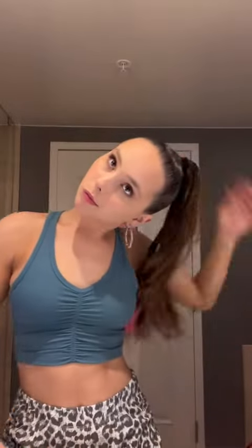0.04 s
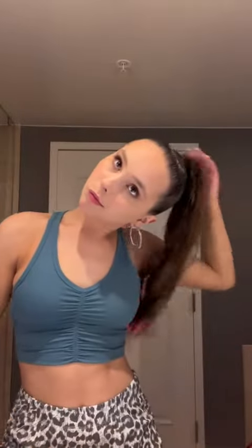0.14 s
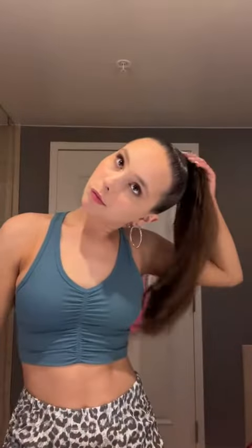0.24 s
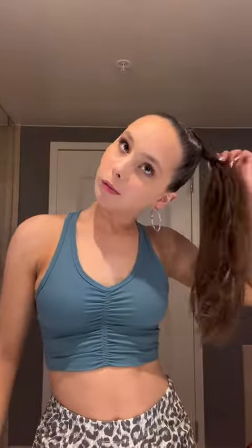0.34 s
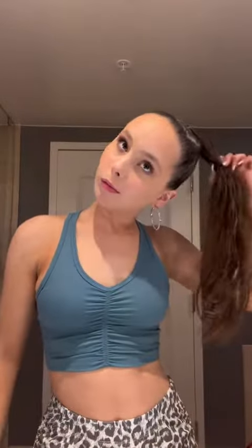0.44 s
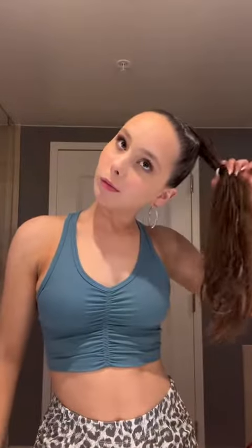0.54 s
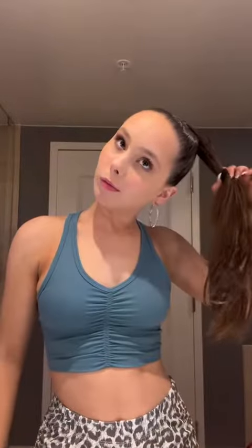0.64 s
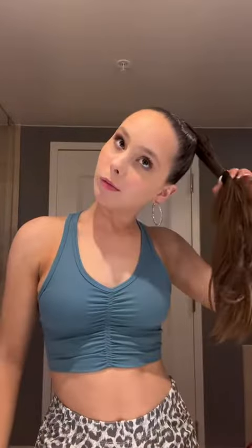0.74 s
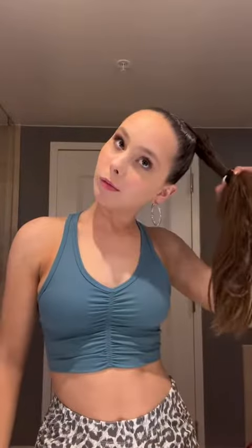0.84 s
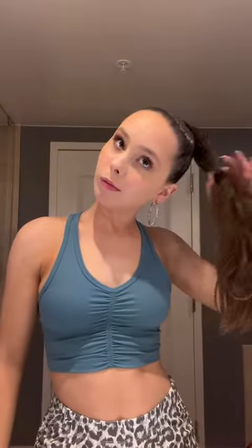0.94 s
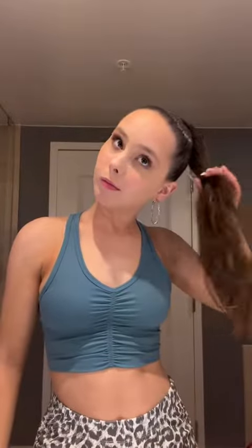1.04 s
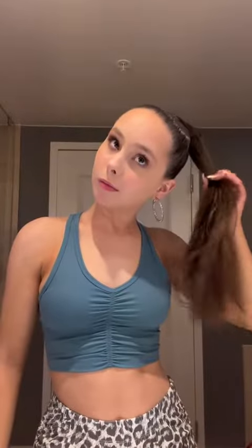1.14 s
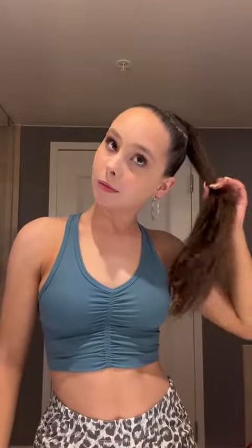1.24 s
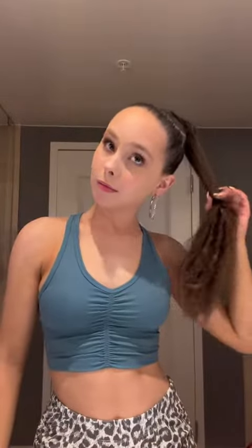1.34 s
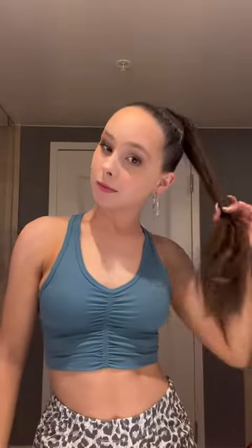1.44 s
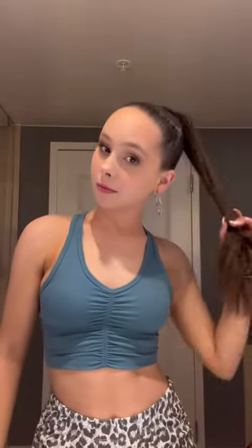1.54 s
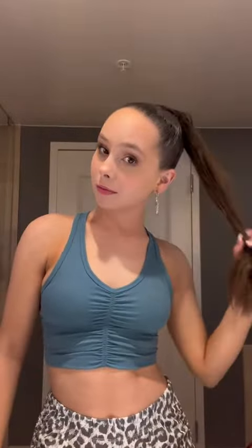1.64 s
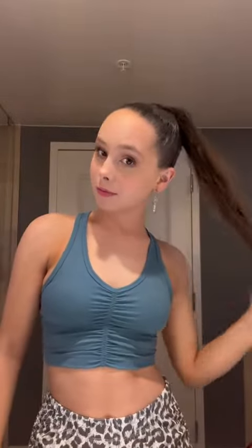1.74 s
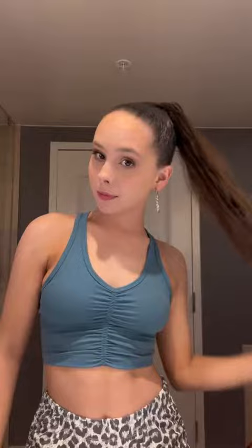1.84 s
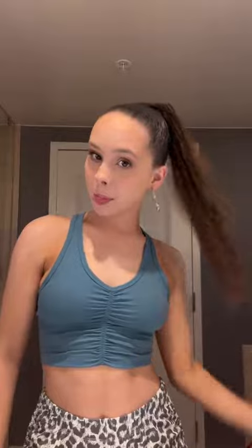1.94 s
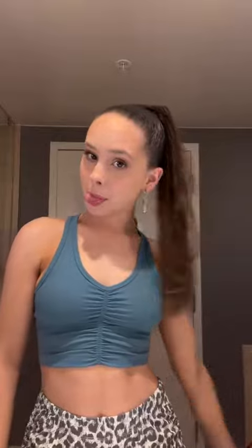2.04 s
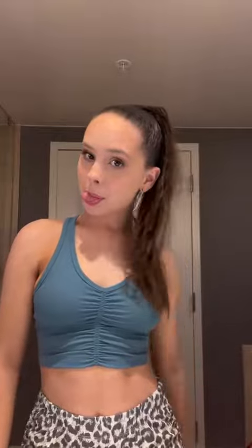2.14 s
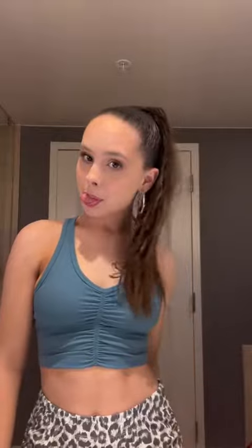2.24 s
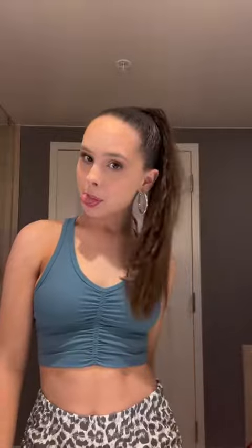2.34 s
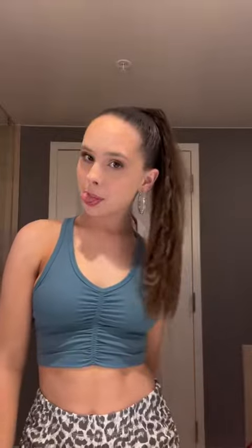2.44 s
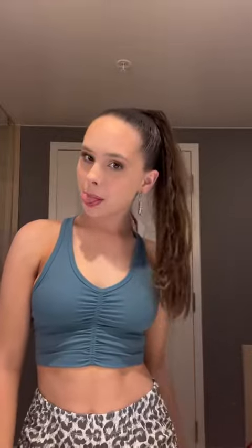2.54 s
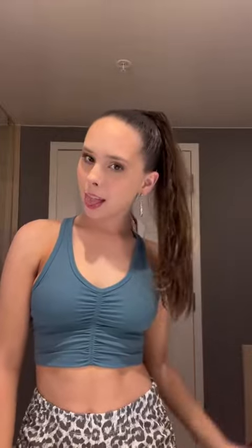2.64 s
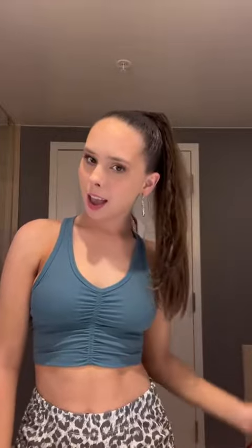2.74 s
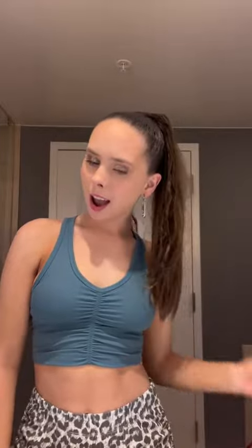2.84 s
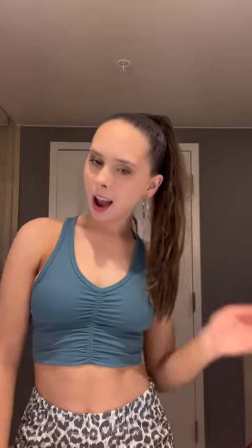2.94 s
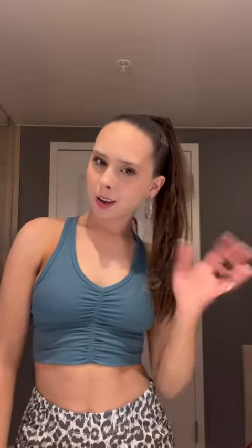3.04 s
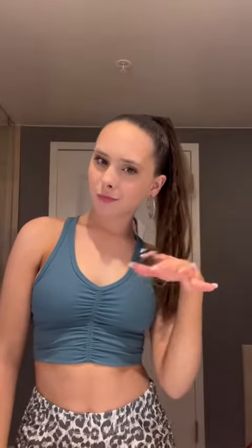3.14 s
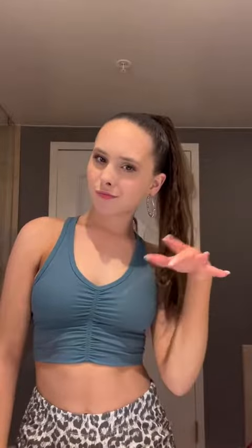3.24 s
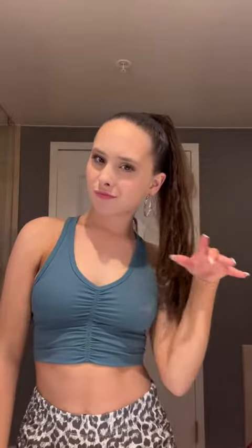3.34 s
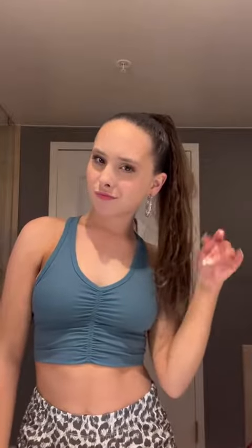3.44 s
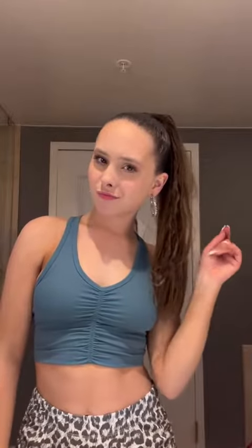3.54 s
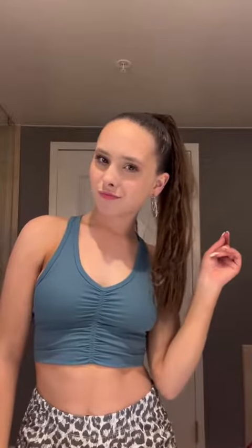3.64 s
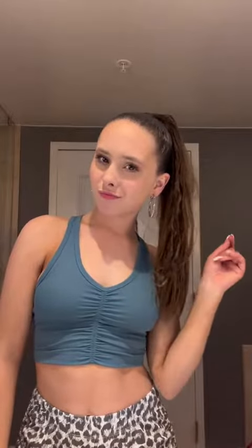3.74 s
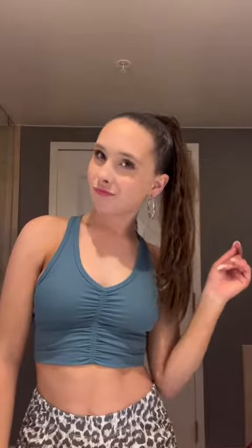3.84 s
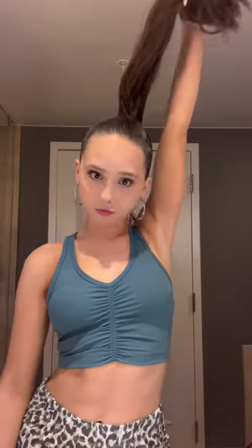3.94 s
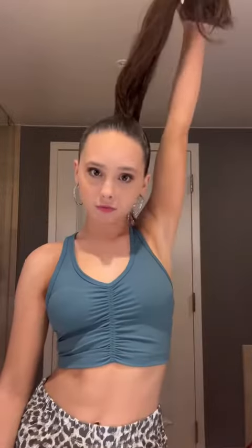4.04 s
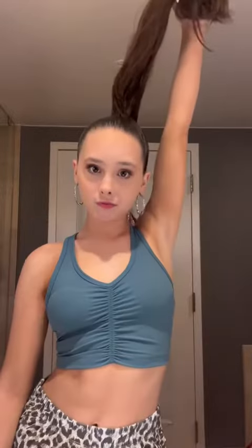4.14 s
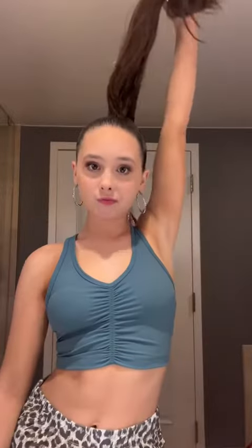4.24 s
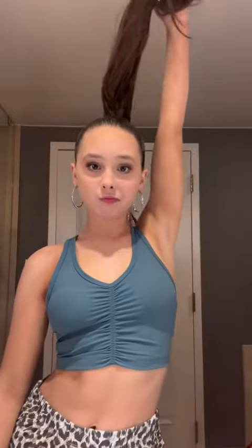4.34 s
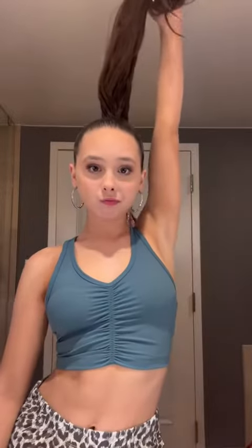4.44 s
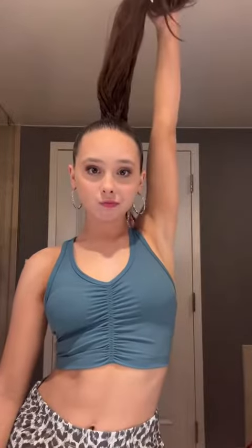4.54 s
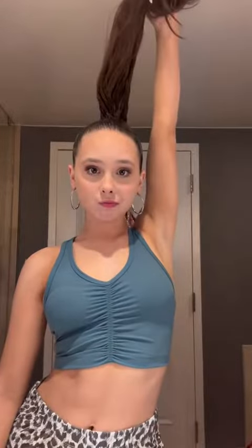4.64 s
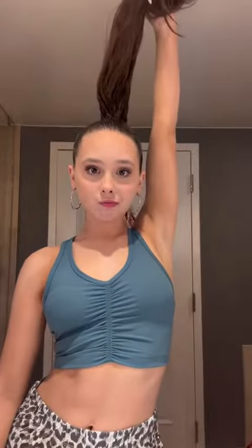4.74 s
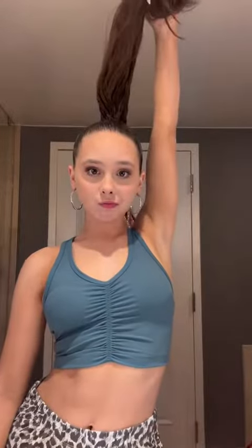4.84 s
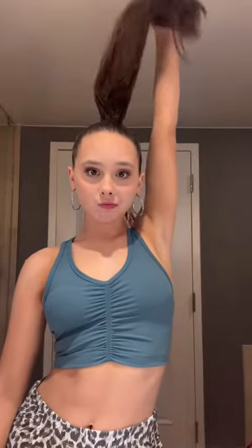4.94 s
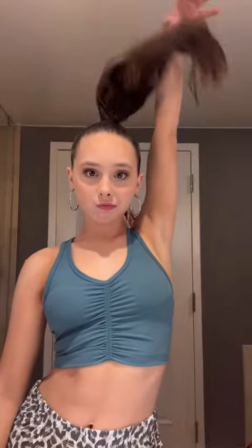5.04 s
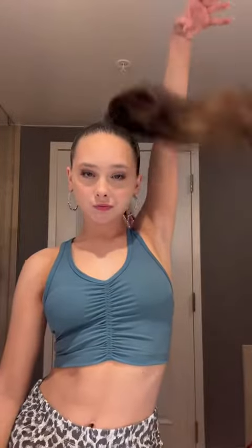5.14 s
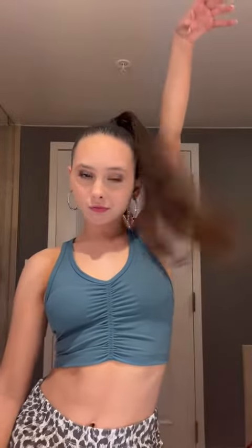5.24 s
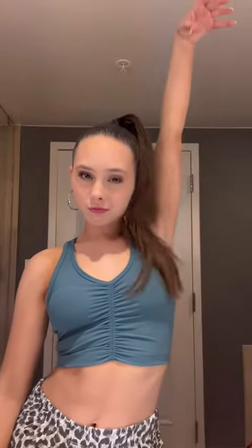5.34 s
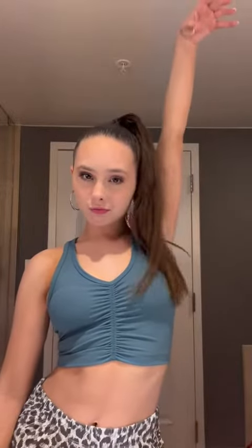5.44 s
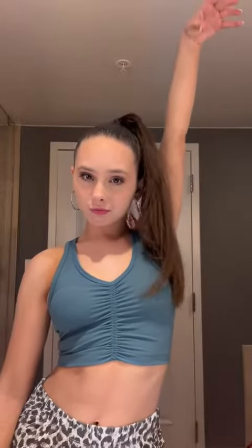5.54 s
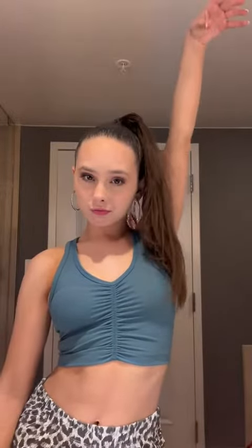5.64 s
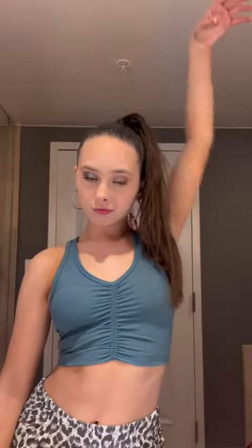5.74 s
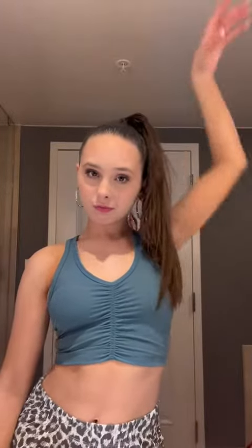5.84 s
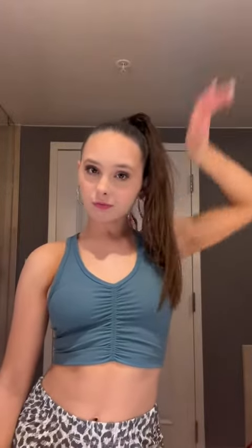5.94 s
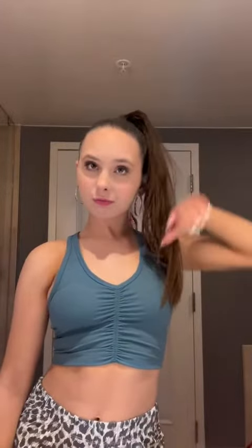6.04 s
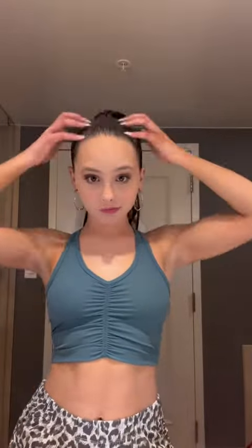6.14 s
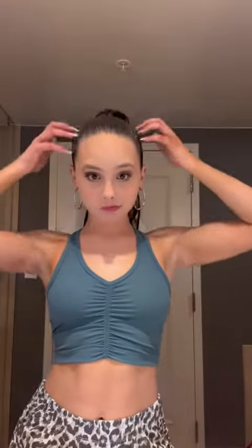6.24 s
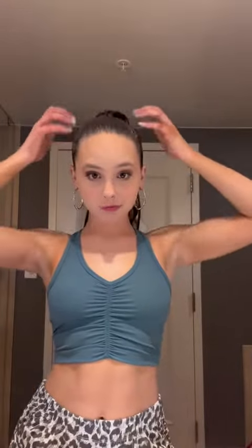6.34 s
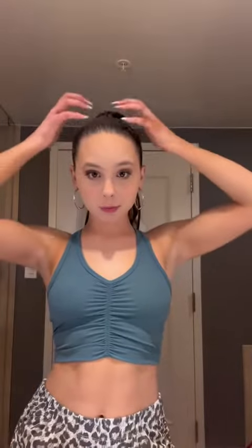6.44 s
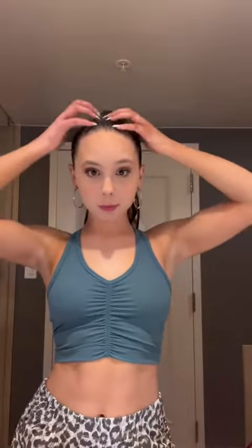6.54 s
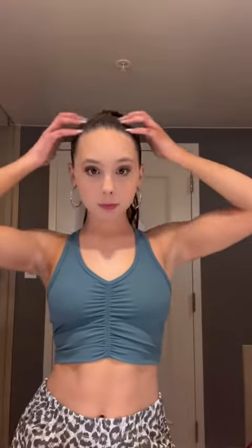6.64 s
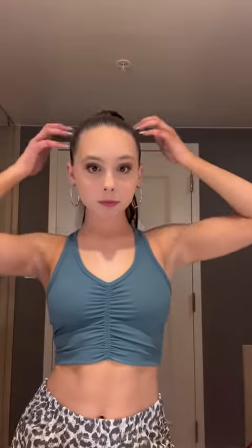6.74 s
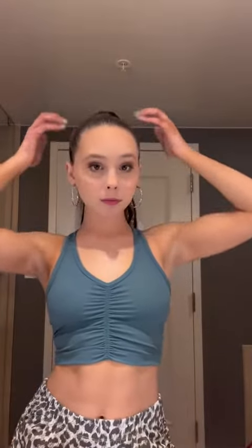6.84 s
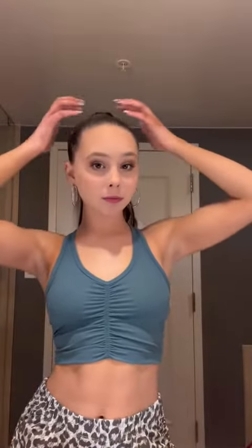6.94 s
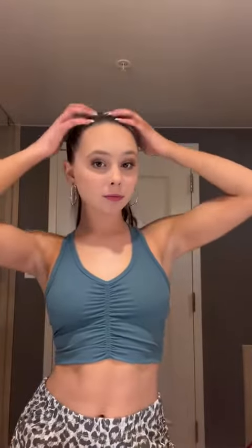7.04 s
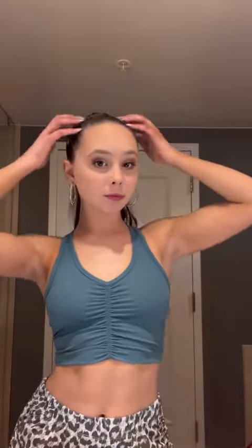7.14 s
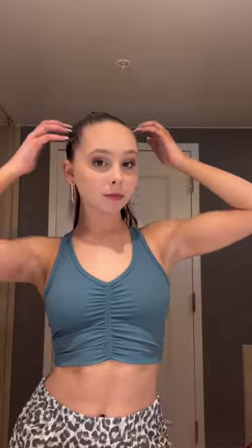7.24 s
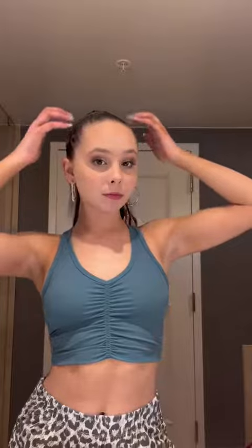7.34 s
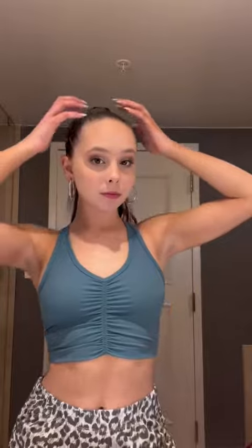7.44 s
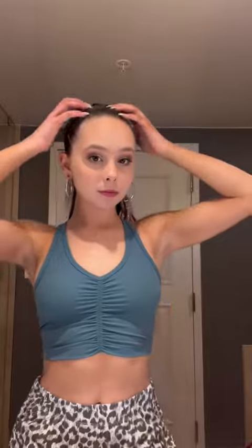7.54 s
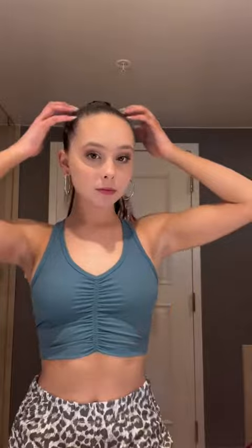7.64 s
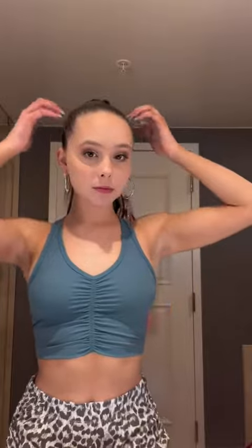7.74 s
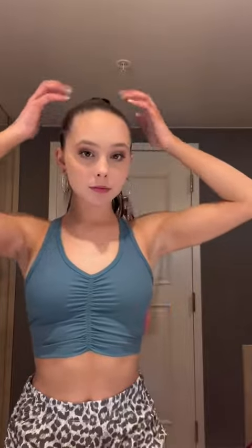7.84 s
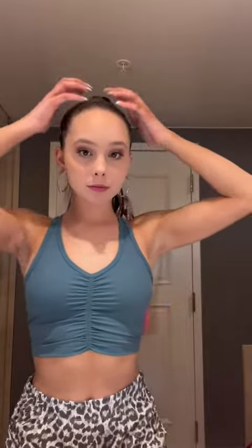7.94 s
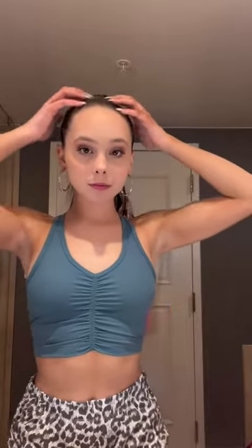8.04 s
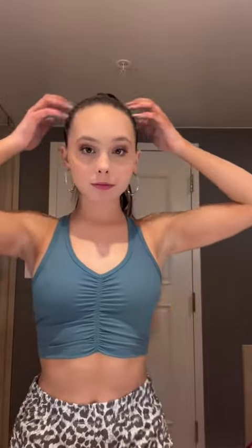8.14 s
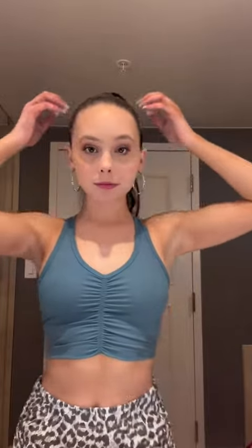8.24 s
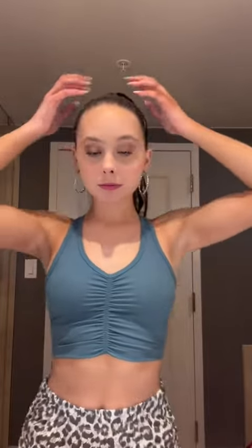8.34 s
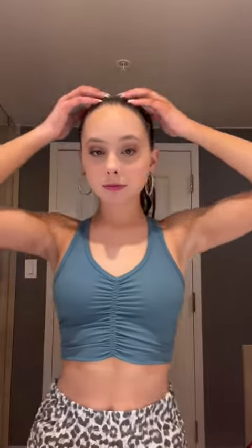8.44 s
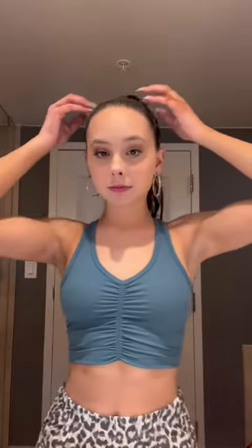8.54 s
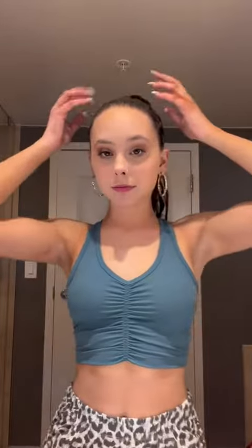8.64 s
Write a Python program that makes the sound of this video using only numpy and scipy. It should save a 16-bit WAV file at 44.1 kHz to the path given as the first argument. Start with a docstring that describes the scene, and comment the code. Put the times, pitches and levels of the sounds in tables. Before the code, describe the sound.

A small, quiet room has a wavering low rumble, a faint hum and thin hiss, with occasional soft bass swells. From 0 to about 3.2 seconds, a hand slides along loose hair with very faint, fine rustles and a few tiny nail ticks, slightly clearer around 1.7. At 3.3 a single finger snap cracks out, by far the loudest sound, hollow and woody with a brief room echo; a barely audible finger touch follows near 3.65. At 3.9 comes a tiny, dry double crackle. Near-quiet until about 5.26, when lifted hair drops onto a shoulder with a soft, brushy pat. From 6.15, both hands smooth tight hair in six short, crisp, raspy strokes, near 6.2, 6.65, 7.15, 7.65, 8.1 and 8.5, each swelling and fading quickly. Sharp nail ticks accompany several strokes. The pickup is close, the last stroke near the end.

```python
"""Hair and hands in a small room

Someone plays with a slicked-back ponytail in front of a phone in a small, quiet room. A hand runs
down the ponytail (stick-slip clicks), the fingers snap once (damped modes and a filtered blow), a dry
crackle follows (noise bursts), the lifted hair drops onto a shoulder, then both hands smooth the tight
hair over the scalp six times (denser clicks, nails ticking on strands). The room rumbles softly (noise,
faint hum). In every rub the hand gathers speed, holds it and slows down."""
import sys
import numpy as np
from scipy import signal
from scipy.fft import rfft, irfft
from scipy.io import wavfile

SR = 44100
rng = np.random.default_rng(int(sys.argv[2]) if len(sys.argv) > 2 else 0)


def to_wav(sig):
    """Store sig (one row per channel, or 1-D mono) as 16-bit WAV at the path in sys.argv[1].

    Samples outside -1..1 are clipped; the rate is SR.
    """
    pcm = np.clip(np.atleast_2d(sig), -1, 1) * 32767
    pcm = np.round(pcm).astype(np.int16)
    wavfile.write(sys.argv[1], SR, pcm.T)  # frames by channels


N = 383669
TIME = np.arange(N) / SR  # seconds

# Steps of the background. Each row: start in seconds, rumble in dB, low rush in dB,
# sinking of the rush in dB per second.
BACKGROUND_STEPS = [(0, -64.5, -69, 2), (0.651, -67, -66.5, 3.5), (2.0, -68.5, -72, 0),
                    (3.919, -66.5, -61.5, 3), (6.15, -70.5, -77, 0.3), (8.52, -69, -71.5, -7)]
# Low swells of the background. Each row: full level reached in seconds, hold in seconds,
# rumble in dB, boom in dB.
BASS_SWELLS = [(.25, 0.22, -60.5, -67.5), (1.6, .12, -62.5, -81), (3.08, .1, -65.5, -73),
               (3.6, .1, -59.5, -66.5), (3.935, 0.041, -60.5, -55)]
SWELL_RISE_DB_PER_S, SWELL_FALL_DB_PER_S = 600, 92
BOOM_LO_HZ, BOOM_HI_HZ = 110, 176
# Spectra of rumble, rush and thin steady hiss. Each row: frequency in Hz, response in dB.
RUMBLE_SPECTRUM = [(20, -31.5), (35, -12), (50, -4), (62, 2), (73, 0), (86, -1), (105, -10), (150, -14.5),
                   (220, -30), (500, -59.5)]
RUSH_SPECTRUM = [(60, -16.5), (115, 0), (135, 3), (150, 3), (200, -14), (255, -6), (340, -16.5),
                 (600, -19.5), (900, -30), (1500, -31.5), (1950, -21.5), (2700, -49.5), (9000, -61)]
AIR_SPECTRUM = [(150, -4.5), (400, 8), (700, -14.5), (1100, -12.5), (1500, -2), (1950, 4.5), (2700, -5),
                (6000, -7), (9500, -12.5), (13000, -16.5)]
AIR_DB = -82.5
# Faint hum in the room. Each row: frequency in Hz, level in dB before it wanders.
HUM_TONES = [(74, -76), (148, -81)]

# Loose hair slides through the hand or over the shoulder. Each row: full speed reached in seconds,
# hold in seconds, strand hiss in dB, skin rub in dB.
LOOSE_SLIDES = [(0.0, .13, -94, -66), (.2, 0.29, -72, -68), (.53, 0.23, -70.4, -68.5),
                (.85, 0.095, -87, -72), (1.14, 0.26, -68.5, -66), (1.41, 0.25, -66, -68),
                (1.684, 0.079, -62, -63.5), (1.84, 0.011, -73, -68), (2.085, 0.15, -73, -72),
                (2.423, 0.027, -72.5, -65), (2.997, 0.03, -73.5, -65.5), (3.125, 0.029, -67, -62),
                (3.67, 0.073, -93, -71.5), (3.803, 0.053, -69, -63.5), (4.21, 0.23, -84, -77.5),
                (5.205, .05, -79, -75.5), (5.98, .04, -82, -77.5), (6.068, 0.044, -72, -68.5),
                (6.485, 0.007, -94, -74.5), (7.42, 0.1, -80, -75), (7.9, .045, -71, -64),
                (8.36, 0.074, -80, -72)]
SLIDE_RISE_DB_PER_S, SLIDE_FALL_DB_PER_S = 326.5, 166
# Friction spectra of loose strands and of skin. Each row: frequency in Hz, response in dB.
LOOSE_HISS_SPECTRUM = [(300, -9.5), (1000, -7), (2700, -1.5), (4000, -1.5), (6000, 0), (7000, -1.5),
                       (10300, -4), (12200, -21.5), (15500, -38)]
LOOSE_RUB_SPECTRUM = [(300, -32), (850, -18), (1400, 0), (1650, -1.5), (1900, 6), (2400, -2.5),
                      (3100, -17.5), (6000, -39.5)]

# Nails catch single strands. Each row: time in seconds, level in dB,
# frequency in Hz around which the tick is brightest.
NAIL_CATCHES = [(.345, -52.5, 5000), (.951, -63.5, 4370), (1.138, -52.5, 2200), (6.150, -37, 7000),
                (7.048, -40, 5300), (7.097, -37, 8800), (7.133, -38.5, 6000), (7.647, -35, 3360),
                (8.011, -43, 5660), (8.108, -45, 6000), (8.450, -35, 3920)]

# Finger on palm: the snap, then a soft touch. Each row: time in seconds, level in dB.
FINGER_SNAPS = [(3.301, -19.5), (3.657, -56)]
# Modes of the air pocket between finger and palm. Each row: frequency in Hz, T60 in seconds, level in dB.
POCKET_MODES = [(1920, 0.053, -0.5), (2040, 0.02, -4.5), (2570, 0.028, -17), (6150, .015, -33.5)]
# Spectrum of the slap of the flesh. Each row: frequency in Hz, response in dB.
SLAP_SPECTRUM = [(60, -34), (150, 4), (320, -2.5), (420, -4.5), (600, -1), (1000, -7.5), (1500, -27),
                 (2600, -23), (3200, -30), (9000, -29), (14000, -45.5)]
# Standing waves between the walls. Each row: frequency in Hz, T60 in seconds, level in dB.
WALL_MODES = [(152, 0.35, 2), (176, 0.44, -13), (342, 0.69, -7.5), (661, 0.23, -3)]
SLAP_DB, BOOM_DB = 17.5, -28  # flesh and standing waves, added to the level of each snap

# A short dry crackle. Each row: time in seconds, level in dB.
CRACKLE_TICKS = [(3.904, -33), (3.9052, -45), (3.9063, -45), (3.9078, -32.5)]

# Locks of the ponytail land on the shoulder. Each row: time in seconds, level in dB, decay in seconds.
LOCKS_LANDING = [(5.264, -55.5, 0.066), (5.28, -43.5, 0.014), (5.3, -44, 0.031)]
# Spectrum of the landing. Each row: frequency in Hz, response in dB.
LANDING_SPECTRUM = [(35, -19), (65, 10), (150, -5), (300, -2), (420, -11), (650, -5), (1000, -6.5),
                    (1500, 1), (2000, 2.5), (2700, -5.5), (3800, -15), (6000, -14), (10000, -17),
                    (13000, -28)]

# Both hands smooth the scalp. Each row: fingertips land in seconds, touch in dB, full speed reached in
# seconds, full speed held in seconds, strand hiss in dB, palm rub in dB, fall of the rub in dB per second.
SCALP_STROKES = [(6.146, -44.5, 6.175, 0.065, -45.7, -47.5, 213),
                 (6.537, -57.5, 6.65, 0.084, -40, -45.5, 168),
                 (7.02, -52.5, 7.165, 0.036, -40.5, -45.5, 149),
                 (7.5, -51.5, 7.644, 0.056, -42.5, -48.5, 171), (7.986, -53, 8.126, 0.026, -40.5, -46, 155),
                 (8.429, -50, 8.521, 0.011, -39, -41, 153)]
STROKE_RISE_DB_PER_S, STROKE_FALL_DB_PER_S = 240.5, 218
# The touch of the fingertips before each stroke, and its dull part relative to its hiss.
TOUCH_RISE_S, TOUCH_DECAY_S, TOUCH_RUB_DB = .007, .056, -2.5
PALM_LEAD_S = 0.011  # the palm rub reaches its full level a little ahead of the strand hiss
PALM_HOLD_SHARE = 0.62  # the palm rub starts to fade before the strand hiss, but dies away more slowly
# Friction spectra of taut strands and of palms. Each row: frequency in Hz, response in dB.
SCALP_HISS_SPECTRUM = [(200, -35), (500, -19), (900, -19.5), (1500, -5.5), (2700, -2.5), (3800, -3),
                       (5000, -2.5), (6200, 1), (6600, -4), (7400, -2), (10400, -5.5), (11300, -10),
                       (12200, -29.5), (15500, -61)]
SCALP_RUB_SPECTRUM = [(150, -27.5), (250, -22.5), (400, -26.5), (600, -20), (880, -23.5), (1400, -8.5),
                      (1650, -10.5), (1900, 4.5), (2200, -6), (2600, -12), (5000, -38.5)]

# First reflections off ceiling and walls. Each row: delay in seconds, level in dB.
FIRST_ECHOES = [(.0062, -15), (.0095, -15), (.019, -6), (.034, -11), (.047, -9.5)]
# Reverberation time. Each row: frequency in Hz, T60 in seconds.
REVERBERATION = [(100, 0.68), (300, 0.99), (700, 0.74), (1900, 0.37), (5000, 0.42), (14000, 0.13)]
# Difference between the two microphones relative to their sum. Each row: frequency in Hz, ratio in dB.
STEREO_WIDTH = [(60, -29.5), (130, -19.5), (280, -8.5), (800, -5.5), (1500, -9.5), (2300, -14), (2800, -6),
                (6000, -7), (6700, -17.5), (7700, -16), (8200, -6), (11000, -4.5), (13000, -26.5)]
# Narrow peaks in the colour of the microphone. Each row: frequency in Hz, width in Hz, added share in dB.
MICROPHONE_PEAKS = [(2664, 67, -3), (3670, 16, -7.5), (4664, 27, -4), (4950, 44, -10.5), (6110, 50, -17.5)]
TOP_HZ = 15900


def undb(db):
    """The decibel law: an amplitude gain is 10 to the power dB / 20."""
    return 10 ** (np.asarray(db) / 20)


def unit(x):
    """Power normalisation: the root mean square becomes 1."""
    return x / np.sqrt(np.mean(x ** 2))


def on_log_axis(hz, points):
    """Interpolation of (Hz, value) points along a logarithmic frequency axis."""
    f, value = np.transpose(points)
    return np.interp(np.log(np.maximum(hz, 1)), np.log(f), value)


def colour(x, points, size=8192):
    """Minimum-phase filtering: folding the cepstrum makes the given (Hz, dB) response causal."""
    response_db = on_log_axis(np.fft.rfftfreq(size, 1 / SR), points)
    cepstrum = irfft(np.log(undb(response_db)))
    cepstrum[1:size // 2] *= 2
    cepstrum[size // 2 + 1:] = 0
    impulse_response = irfft(np.exp(rfft(cepstrum)))
    return signal.fftconvolve(x, impulse_response)[:len(x)]


def band(x, lo_hz, hi_hz, order=2):
    """Butterworth band-pass: power is passed between two edge frequencies."""
    edges = np.clip([lo_hz, hi_hz], 10, .48 * SR)
    return signal.sosfilt(signal.butter(order, edges, "band", fs=SR, output="sos"), x)


def add(track, s, sound):
    """Superposition: a sound is summed into the track at time s."""
    start = int(s * SR)
    track[start:start + len(sound)] += sound[:N - start]


def walk(rate):
    """Slow random modulation: Gaussian values, rate a second, joined by straight lines."""
    knots = rng.standard_normal(N // 10)
    return np.interp(TIME * rate, np.arange(len(knots)), knots)


def burst(decay_s):
    """Impulsive excitation: white noise under an exponential decay."""
    t = TIME[:SR // 10]
    return rng.standard_normal(len(t)) * np.exp(-t / decay_s)


def damped(modes, t):
    """Modal synthesis: a sum of exponentially decaying sines from (Hz, T60 s, dB) rows."""
    return sum(undb(db) * np.sin(2 * np.pi * hz * t) * np.exp(-np.log(1000) * t / t60)
               for hz, t60, db in modes)


def slips(rate, spread_db):
    """Stick-slip friction: random clicks, rate a second; a wider spread lets a few stand out."""
    sizes = undb(spread_db * np.minimum(rng.exponential(size=N), 5))
    happens = rng.random(N) < rate / SR
    signs = rng.choice([-1, 1], N)
    return unit(happens * sizes * signs / np.sqrt(rate))  # the root keeps power even as the rate varies


def restless(x, depth_db, size=512):
    """Fluctuating spectrum: random gains for each frequency and moment make the colour of the noise shift."""
    spectra = signal.stft(x, nperseg=size)[2]
    gains = undb(depth_db * rng.standard_normal(spectra.shape))
    return unit(signal.istft(spectra * gains, nperseg=size)[1][:N])


def fall(s, decay_s, rise_s):
    """Damped envelope: a quick linear rise at time s, then an exponential decay."""
    age = np.maximum(TIME - s, 0)
    return np.minimum(age / rise_s, 1) * np.exp(-age / decay_s)


def glide(s, hold_s, rise_db_per_s, fall_db_per_s):
    """Swelling envelope: gain reaches 1 at time s, holds and dies away, evenly in dB."""
    before_s = np.maximum(s - TIME, 0)
    after_s = np.maximum(TIME - s - hold_s, 0)
    return undb(-rise_db_per_s * before_s - fall_db_per_s * after_s)


def diffuse_tail():
    """Diffuse reverberation: octaves of noise, each with its own T60, at unit total energy."""
    t, tail = TIME[:SR], np.zeros(SR)
    for hz in 62.5 * 2. ** np.arange(9):
        octave = band(rng.standard_normal(SR), hz / np.sqrt(2), hz * np.sqrt(2), order=3)
        tail += octave * np.exp(-np.log(1000) * t / on_log_axis(hz, REVERBERATION))
    tail *= np.clip(t / 0.0027, 0, 1)
    return tail / np.sqrt(np.sum(tail ** 2))


def stereo(mid, side):
    """Sum and difference: closely spaced microphones differ by an amount that depends on frequency."""
    side = colour(side, STEREO_WIDTH)
    return np.array([mid + side, mid - side])


def room(x, wet_db, echo_db):
    """Room response by convolution: direct sound, reflections from all sides and a diffuse tail."""
    mid, side = undb(wet_db) * diffuse_tail(), undb(wet_db) * diffuse_tail()
    mid[0] += 1  # direct sound
    for k, (s, db) in enumerate(FIRST_ECHOES):
        mid[int(s * SR)] += undb(db + echo_db)
        side[int(s * SR / 2)] += (-1) ** k * undb(db)  # alternating sides, at half the delay
    heard = []
    for response in (mid, side):
        response = response / np.sqrt(np.sum(response ** 2))
        heard.append(signal.fftconvolve(x, response)[:N])
    return stereo(*heard)


def background():
    """Filtered noise: a wavering rumble with faint hum, soft rush and thin hiss; at times the bass booms."""
    rumble, rush, boom = np.zeros(N), np.zeros(N), np.zeros(N)
    for s, rumble_db, rush_db, sink_db_per_s in BACKGROUND_STEPS:
        later = TIME >= s
        rumble[later] = undb(rumble_db)
        rush[later] = undb(rush_db - sink_db_per_s * (TIME[later] - s))
    for s, hold_s, rumble_db, boom_db in BASS_SWELLS:
        swell = glide(s, hold_s, SWELL_RISE_DB_PER_S, SWELL_FALL_DB_PER_S)
        rumble = np.hypot(rumble, undb(rumble_db) * swell)  # powers add
        boom += undb(boom_db) * swell
    layers = [(rumble * undb(1.6 * walk(14)), RUMBLE_SPECTRUM),
              (rush * undb(1.2 * walk(17)), RUSH_SPECTRUM),
              (undb(AIR_DB), AIR_SPECTRUM)]
    # independent noise for the sum and the difference of the microphones
    mid, side = (sum(gain * unit(colour(rng.standard_normal(N), points)) for gain, points in layers)
                 for _ in range(2))
    hum = np.zeros(N)
    for hz, db in HUM_TONES:
        level = undb(db + 3.1 * walk(11)) * np.sqrt(2)  # root 2 turns rms into amplitude
        hum += level * np.sin(2 * np.pi * hz * TIME + 0.65 * walk(8.4))
    booms = boom * unit(band(rng.standard_normal(N), BOOM_LO_HZ, BOOM_HI_HZ))
    return stereo(mid, side) + booms + hum * unit(rush) ** .7  # the hum swells and sinks with the rush


def ponytail():
    """Light friction: loose hair on hand and shoulder rustles finely; one slide takes over from the last."""
    hiss, rub = np.zeros(N), np.zeros(N)
    for s, hold_s, hiss_db, rub_db in LOOSE_SLIDES:
        speed = glide(s, hold_s, SLIDE_RISE_DB_PER_S, SLIDE_FALL_DB_PER_S)
        hiss = np.maximum(hiss, undb(hiss_db) * speed)
        rub = np.maximum(rub, undb(rub_db) * speed)
    strands = restless(colour(slips(12000, spread_db=2.4), LOOSE_HISS_SPECTRUM), depth_db=3)
    strands *= undb(1.0 * walk(40))
    skin = restless(colour(slips(8000, spread_db=1.8), LOOSE_RUB_SPECTRUM), depth_db=3)
    skin *= undb(1.6 * walk(35))
    return hiss * strands + rub * skin


def catches():
    """Sudden release: a strand hooks on a nail and lets go with a band-limited tick."""
    out = np.zeros(N)
    for s, db, hz in NAIL_CATCHES:
        add(out, s, undb(db) * band(burst(0.0052), hz / 2, hz * 1.6))
    return out


def snap():
    """Cavity resonance: a slap rings the air pocket under the finger; the dull blow comes mostly by walls."""
    ring, blow, boom, t = np.zeros(N), np.zeros(N), np.zeros(N), TIME[:SR]
    pocket = damped(POCKET_MODES, t) * (1 - np.exp(-t / 0.00031)) ** 2
    standing = damped(WALL_MODES, t) * (1 - np.exp(-t / 0.0047))  # standing waves build up slowly
    for s, db in FINGER_SNAPS:
        add(ring, s, undb(db) * pocket)
        add(blow, s + 0.0011, undb([db + SLAP_DB]))  # a single impulse
        add(boom, s, undb(db + BOOM_DB) * standing)
    ring_in_room = room(ring, wet_db=-2.5, echo_db=-18.0)
    slap_in_room = room(colour(blow, SLAP_SPECTRUM), wet_db=11.5, echo_db=4.0)
    return ring_in_room + slap_in_room + boom


def crackle():
    """Impulsive noise: a few dry ticks in quick succession, without reverberation."""
    out = np.zeros(N)
    for s, db in CRACKLE_TICKS:
        tick = burst(0.00073)
        add(out, s, undb(db) * (band(tick, 2750, 5000) + 0.24 * band(tick, 200, 11000)))
    return out


def landing():
    """Soft impact: the bundle of hair falls on the shoulder, lock after lock, with a soft thump."""
    swell = sum(undb(db) * fall(s, decay_s, rise_s=0.0033) for s, db, decay_s in LOCKS_LANDING)
    return swell * unit(colour(slips(14000, spread_db=3.5), LANDING_SPECTRUM))


def strokes():
    """Speed governs friction level: fingertips land, then strand hiss and palm rub grow, hold and fade."""
    hiss, rub = np.zeros(N), np.zeros(N)
    for lands_s, touch_db, full_s, hold_s, hiss_db, rub_db, rub_fall_db_per_s in SCALP_STROKES:
        contact = np.clip((TIME - lands_s) / TOUCH_RISE_S, 0, 1)
        touch = undb(touch_db) * fall(lands_s, TOUCH_DECAY_S, TOUCH_RISE_S)
        strands = glide(full_s, hold_s, STROKE_RISE_DB_PER_S, STROKE_FALL_DB_PER_S)
        palms = glide(full_s - PALM_LEAD_S, PALM_HOLD_SHARE * hold_s,
                      STROKE_RISE_DB_PER_S, rub_fall_db_per_s)
        hiss += np.hypot(touch, contact * undb(hiss_db) * strands)
        rub += np.hypot(undb(TOUCH_RUB_DB) * touch, contact * undb(rub_db) * palms)
    return hiss, rub


def scalp():
    """Stick-slip of taut strands: slips come more densely as the hands speed up; palms rub more dully."""
    hiss, rub = strokes()
    rate = 1500 + 10000 * hiss / hiss.max()  # slips per second
    grip = undb(2.26 * walk(70))  # the fingers hold and let go unevenly
    strands = restless(colour(slips(rate, spread_db=0.0), SCALP_HISS_SPECTRUM), depth_db=3.5)
    strands *= undb(0.1 * walk(280))
    palm = restless(colour(slips(rate, spread_db=3.0), SCALP_RUB_SPECTRUM), depth_db=-2.0)
    palm *= undb(1.7 * walk(60))
    return grip * (hiss * strands + rub * palm)


def scene():
    """Superposition of sources: hair and hands in the room, over its background."""
    loose = room(ponytail(), wet_db=-14.5, echo_db=-5.5)
    tight = room(scalp() + catches(), wet_db=-8.0, echo_db=-11.5)
    drop = room(landing(), wet_db=-13, echo_db=-14)
    return background() + loose + snap() + crackle() + drop + tight


def record(dry):
    """Linear filtering by the phone: a few narrow resonances are added and the top octave is cut short."""
    peaks = sum(undb(db) * signal.lfilter(*signal.iirpeak(hz, hz / width, fs=SR), dry)
                for hz, width, db in MICROPHONE_PEAKS)
    low_pass = signal.ellip(8, .2, 70, TOP_HZ, fs=SR, output="sos")
    return signal.sosfilt(low_pass, dry + peaks)


dry = scene()
out = record(dry)
to_wav(out)
```